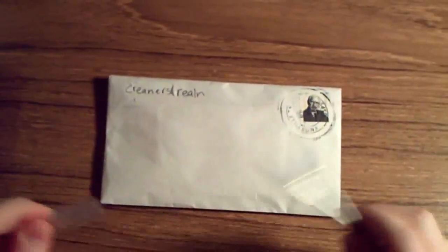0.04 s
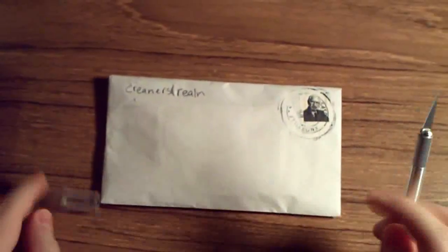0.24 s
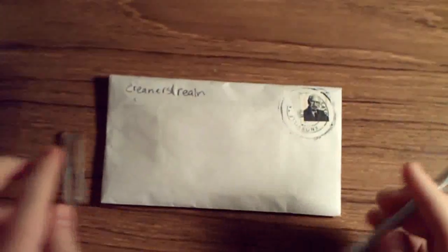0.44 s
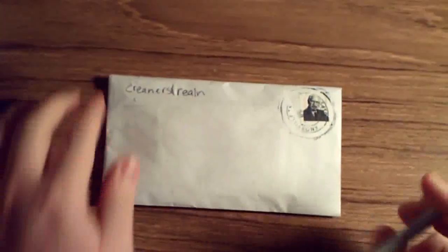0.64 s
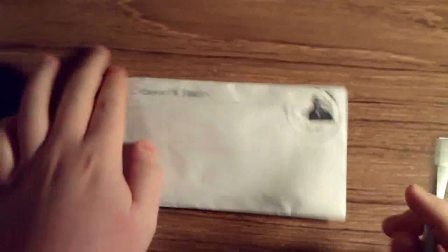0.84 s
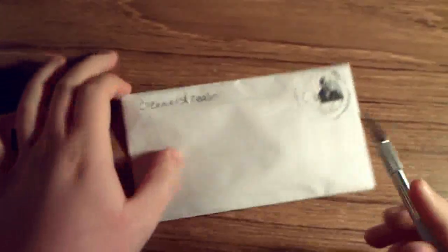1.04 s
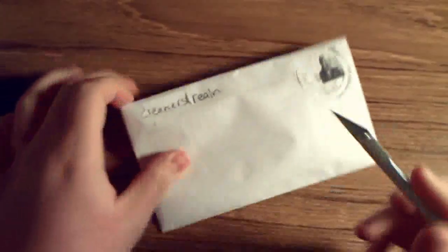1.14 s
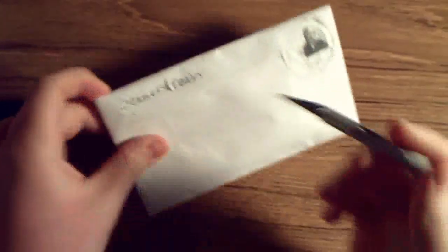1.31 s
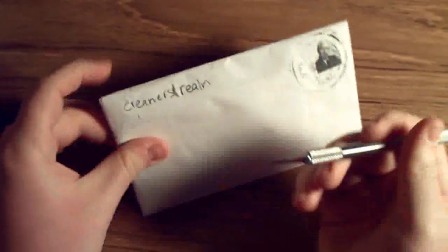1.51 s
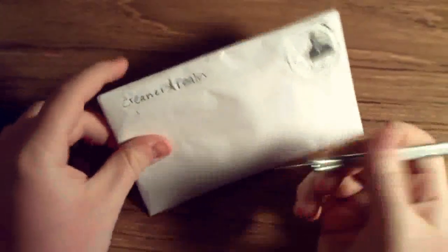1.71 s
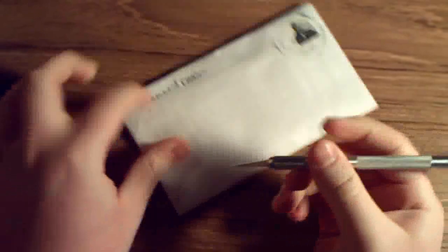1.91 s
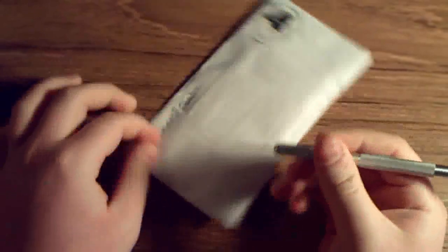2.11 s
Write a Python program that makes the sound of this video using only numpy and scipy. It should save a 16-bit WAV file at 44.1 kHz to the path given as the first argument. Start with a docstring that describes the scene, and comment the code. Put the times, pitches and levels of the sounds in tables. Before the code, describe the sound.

A small plastic cap rattles on a wooden table, then a paper envelope slides and crackles.

```python
"""A craft knife's small plastic cap clicks down on a wooden table, topples and rattles to rest.
Each hit knocks the wood and rings the cap's modes; later a hand knocks it again.
The hand slides a paper envelope over the wood and lifts it: fibres slip and hiss, creases buckle and snap.
Behind it all is a small quiet room with a low rumble and mains hum."""
import sys
import numpy as np
from scipy import signal
from scipy.fft import rfft, irfft
from scipy.io import wavfile

SR = 44100
rng = np.random.default_rng(int(sys.argv[2]) if len(sys.argv) > 2 else 0)


def to_wav(s):
    """Save 16-bit WAV."""
    ch = np.atleast_2d(s).T  # columns
    pcm = np.round(np.clip(ch, -1, 1) * 32767)  # PCM
    wavfile.write(sys.argv[1], SR, pcm.astype(np.int16))


N = 94815


def from_db(db):
    """Decibels to gain."""
    return 10 ** (np.asarray(db) / 20)


def unit(x):
    """Scale to energy 1."""
    return x / np.sqrt(np.sum(x ** 2) + 1e-20)


def at_level(x, db):
    """Scale to an rms level, steady or moving."""
    return unit(x) * np.sqrt(N) * from_db(db)


def curve(rows, column=1):
    """One table column, linearly interpolated in time."""
    rows = np.array(rows)
    return np.interp(np.arange(N) / SR, rows[:, 0], rows[:, column])


def through(x, response):
    """Convolve with an impulse response."""
    return signal.fftconvolve(x, response)[:N]


def colour(x, points, size=8192):
    """Minimum-phase filter with the given spectrum; keeps the energy of white input."""
    hz, db = np.transpose(points)
    bins_hz = np.arange(size // 2 + 1) * SR / size
    gain = from_db(np.interp(np.log(bins_hz + 1), np.log(hz), db))
    cepstrum = irfft(np.log(gain))
    cepstrum[1:size // 2] *= 2
    cepstrum[size // 2 + 1:] = 0
    response = irfft(np.exp(rfft(cepstrum)))
    return through(x, unit(response))


def resonate(x, hz, q):
    """A band-pass resonance, applied twice for steep skirts."""
    b, a = signal.iirpeak(hz, max(q, 1), fs=SR)
    return signal.lfilter(b, a, signal.lfilter(b, a, x))


def decay(t60_s):
    """Times and envelope of an exponential decay."""
    t = np.arange(SR // 2) / SR
    return t, np.exp(-np.log(1000) * t / t60_s)


def scatter(t60_s):
    """Decaying noise of energy 1."""
    t, envelope = decay(t60_s)
    return unit(envelope * rng.standard_normal(len(t)))


def flutter(t60_s):
    """Decaying micro-contacts of random sign."""
    t, envelope = decay(t60_s)
    return unit(envelope * rng.choice([-1, 1], len(t)))


def contact(t60_s, chatter):
    """A sharp click, then decaying micro-contacts."""
    burst = chatter * scatter(t60_s)
    burst[0] = 1
    return unit(burst)


def grains(per_s, spread_db=2.5):
    """Random tiny slips of uneven size."""
    sizes = from_db(spread_db * np.minimum(rng.exponential(1, N), 4))
    slips = rng.random(N) < per_s / SR
    return slips * sizes * rng.choice([-1, 1], N)


def add(out, start_s, db, sound):
    """Mix in an event; its level is that of its energy packed into 1 ms."""
    start = int(np.clip(start_s * SR, 0, N - 1))
    part = sound[:N - start]
    out[start:start + len(part)] += from_db(db) * np.sqrt(SR / 1000) * part


# Room noise spectrum. Each row: frequency in Hz, relative gain in dB.
RUMBLE_COLOUR = [(20, 1.5), (60, 2), (85, -8), (150, -8.5), (250, -12), (600, -17), (1400, -26),
                 (2000, -26.5), (4500, -43), (8000, -34), (10000, -39.5), (13000, -53), (15000, -57)]
# Mains hum. Each row: frequency in Hz, rms level in dB.
HUM_TONES = [(58, -73.5), (120, -67)]


def background():
    """Rumble, hiss and hum of the room."""
    t = np.arange(N) / SR
    hum = sum(np.sqrt(2) * from_db(db) * np.sin(2 * np.pi * (hz * t + rng.random()))
              for hz, db in HUM_TONES)
    rumble = colour(rng.standard_normal(N), RUMBLE_COLOUR)
    return hum + at_level(rumble, db=-57.5)


# Echo spectrum. Each row: frequency in Hz, relative gain in dB.
ECHO_COLOUR = [(60, -11), (300, 1), (1400, -4.5), (3000, -3.5), (8000, -1.5), (15000, -2.5)]


def room_echo(x, delay_s=0.003):
    """Near reflections and a short tail."""
    early = from_db(-12) * scatter(t60_s=0.046)
    late = from_db(-12.5) * scatter(t60_s=0.25)
    response = np.r_[np.zeros(int(delay_s * SR)), early + late]
    return colour(through(x, response), ECHO_COLOUR)


# Hand on the table. Each row: start in seconds, initial level in dB, frequency in Hz, T60 in seconds.
HAND_BUMPS = [(0.917, -40.5, 33, 0.11), (1.874, -45.5, 168, 0.15)]


def hand_bumps():
    """The hand bumps the table top: low, soft thuds."""
    out = 0
    for start_s, db, hz, t60_s in HAND_BUMPS:
        age_s = np.maximum(np.arange(N) / SR - start_s, 0)
        envelope = from_db(db) * np.exp(-np.log(1000) * age_s / t60_s)
        out = out + envelope * np.sin(2 * np.pi * hz * age_s)
    return out


# Paper on wood and skin. Each row: time in seconds, hiss level in dB, rub level in dB.
SLIDE_LEVELS = [(0, -65.5, -63.5), (0.07, -73, -82), (0.2, -73, -72), (0.75, -73, -71),
                (0.81, -73.5, -63.5), (0.87, -60.5, -53), (0.915, -60, -68), (0.98, -55.5, -58),
                (1.04, -59.5, -58.5), (1.10, -61, -63.5), (1.14, -55, -53), (1.18, -65.5, -64),
                (1.24, -51, -59), (1.30, -57.5, -57.5), (1.34, -69, -67), (1.40, -65.5, -66.5),
                (1.46, -63, -63), (1.53, -69, -59.5), (1.60, -67.5, -55), (1.66, -64, -57),
                (1.72, -52.5, -60), (1.785, -51.5, -51.5), (1.81, -50.5, -51), (1.88, -55.5, -49.5),
                (1.92, -63.5, -54.5), (1.97, -60.5, -60.5), (2.03, -70.5, -58.5), (2.09, -62.5, -63),
                (2.15, -52, -60.5)]
# Hiss and rub spectra. Each row: frequency in Hz, relative gain in dB.
FIBRE_HISS_COLOUR = [(500, -24), (1700, -4), (2200, 3.5), (3600, 2.5), (4400, 3), (5400, 0), (6100, 3.5),
                     (7000, 0), (8800, -2), (11000, -14.5), (13000, -20), (15000, -40)]
HOLLOW_RUB_COLOUR = [(60, -8), (170, -0.5), (270, -14.5), (430, 0), (560, -7.5), (800, -2), (1150, 1.5),
                     (1450, 4), (1850, -18), (2600, -9.5), (12000, -59)]


def paper_slide():
    """Fibres catch and slip: a bright hiss and the hollow rub of the envelope's body."""
    hiss = at_level(grains(per_s=5000), curve(SLIDE_LEVELS, column=1))
    rub = at_level(grains(per_s=5000), curve(SLIDE_LEVELS, column=2))
    return colour(hiss, FIBRE_HISS_COLOUR) + colour(rub, HOLLOW_RUB_COLOUR)


# The fastest slide. Each row: time in seconds, level in dB.
SWISH_LEVELS = [(1.66, -120), (1.70, -67), (1.73, -57), (1.772, -46.5), (1.795, -54), (1.87, -120)]
# Sheet resonances. Each row: frequency in Hz, Q, relative gain in dB.
SHEET_RESONANCES = [(4550, 12, 0), (4900, 14, -0.12), (6040, 6.8, -1.1)]


def paper_swish():
    """Quick slips of the edge drive the sheet's upper resonances."""
    slips = grains(per_s=1300)
    sheet = sum(from_db(db) * resonate(slips, hz, q) for hz, q, db in SHEET_RESONANCES)
    return at_level(sheet, curve(SWISH_LEVELS))


# Buckling creases. Each row: start in seconds, crack level in dB, panel resonance in Hz,
# crack T60 in seconds, thump level in dB.
CREASE_SNAPS = [(0.848, -47.5, 2570, 0.021, -53), (0.859, -48.5, 6000, 0.012, -62),
                (0.893, -39, 2170, 0.035, -39), (1.136, -44, 2530, 0.028, -60),
                (1.2105, -44, 2360, 0.015, -56), (1.2814, -28, 2980, 0.036, -35),
                (1.2865, -37, 2320, 0.031, -37.5), (1.365, -47.5, 6660, 0.0078, -52),
                (1.389, -45, 2400, 0.065, -45.5), (1.4006, -49.5, 3000, 0.026, -41),
                (1.488, -40, 2900, 0.013, -44.5), (1.5946, -46, 2030, .054, -47),
                (1.6976, -34, 2000, 0.019, -39.5), (1.771, -45, 5600, 0.013, -49),
                (1.788, -45, 2400, 0.013, -40), (1.828, -29.5, 2970, 0.033, -39),
                (1.8413, -36.5, 2360, 0.012, -47), (1.8548, -43, 2180, 0.013, -44),
                (1.8729, -42, 2300, 0.033, -34.5), (1.8859, -36, 2470, .018, -47),
                (1.9292, -45, 3800, 0.0043, -60), (1.9391, -34, 3200, 0.015, -32.5),
                (1.9432, -34.5, 2270, 0.016, -41)]
# Crack and thump spectra. Each row: frequency in Hz, relative gain in dB.
CRACK_COLOUR = [(200, -38), (900, -6.5), (1900, -2.5), (3100, 1), (4200, -4.5), (6500, -5), (9000, -11.5),
                (12000, -32), (15000, -46)]
THUMP_COLOUR = [(150, -22), (430, -17), (580, -13.5), (750, 3.5), (1250, -0.5), (1800, -12), (5000, -36)]


def paper_snaps():
    """Creases buckle: a dry crack with a broad panel resonance, and a thump of the envelope's body."""
    cracks, thumps = np.zeros((2, N))
    for start_s, crack_db, panel_hz, t60_s, thump_db in CREASE_SNAPS:
        crack = flutter(t60_s)
        panel = 1.02 * resonate(crack, panel_hz, q=1.8)
        add(cracks, start_s, crack_db, unit(colour(crack + panel, CRACK_COLOUR)))
        add(thumps, start_s, thump_db, contact(t60_s=0.023, chatter=1.96))
    return cracks + colour(thumps, THUMP_COLOUR)


# Modes of the cap. Each row: frequency in Hz, relative level in dB, T60 in seconds.
PLASTIC_MODES = [(1860, -15, 0.12), (2175, -13.5, 0.12), (2830, -6.5, 0.061), (3120, -17.5, 0.058),
                 (6486, -9.5, 0.076), (8126, -2.5, 0.021), (8175, -10, 0.081), (13900, -27, 0.02)]


def cap_ring(rim_db, rim_above_hz=7500, spread_db=1.6, detune=0.003):
    """The cap rings; the contact point sets the rim's share and shifts each mode a little."""
    out = 0
    for hz, db, t60_s in PLASTIC_MODES:
        t, envelope = decay(t60_s)
        mode_db = db + rim_db * (hz > rim_above_hz) + spread_db * rng.standard_normal()
        strength = from_db(mode_db) * rng.choice([-1, 1])
        mode_hz = hz * (1 + detune * rng.uniform(-1.1, 1))
        out = out + strength * unit(envelope * np.sin(2 * np.pi * mode_hz * t))
    return out


# The cap's edge meets the wood. Each row: start in seconds, level in dB.
HELD_TAPS = [(0.2196, -28.5), (0.2264, -29), (0.2336, -33.5)]
# Damped tap spectrum. Each row: frequency in Hz, relative gain in dB.
HELD_TAP_COLOUR = [(60, 5), (170, 1.5), (650, 7.5), (1050, 1), (1450, -14), (2400, -21), (3550, 8),
                   (4250, -3), (4900, -15), (6100, -28), (7250, -0.5), (7800, -22), (9500, -10.5),
                   (15000, -34)]


def cap_set_down(ring_gain_db=-13.5):
    """Three quick taps, damped by the fingers that still hold the cap."""
    taps, rings = np.zeros((2, N))
    for start_s, db in HELD_TAPS:
        add(taps, start_s, db, contact(t60_s=0.026, chatter=0.87))
        add(rings, start_s, db + ring_gain_db, cap_ring(rim_db=6))
    return colour(taps, HELD_TAP_COLOUR) + rings


# Loose cap on the table. Each row: start in seconds, wood knock in dB, plastic tick in dB, rim in dB.
RATTLE_HITS = [(0.2648, -24, -22, -34), (0.2681, -30, -20.5, -15.5), (0.2735, -26, -40, -41),
               (0.2788, -31.5, -21.5, -35), (0.2875, -32.5, -29.5, -37), (0.2988, -49, -35, -38),
               (0.3232, -34.5, -31.5, -48), (0.332, -38, -30, -39), (0.34, -36, -32.5, -35),
               (0.3540, -27, -46, -43), (0.367, -34, -33.5, -34), (0.3796, -30.5, -33.5, -34),
               (0.397, -39, -43, -53), (0.3996, -33, -41, -39.5), (0.4143, -39, -41.5, -48),
               (0.4234, -42.5, -43, -49), (0.4275, -29.5, -46, -50), (0.4366, -43, -45, -57),
               (0.4522, -42, -54, -55), (0.4790, -36, -43.5, -54), (0.4902, -39, -61, -66),
               (0.879, -34.5, -37.5, -52), (0.9259, -27.5, -30.5, -30.5), (0.9328, -32, -43, -44),
               (0.9417, -43, -40.5, -43), (0.9493, -40, -51, -46), (0.9536, -34, -44, -50),
               (0.9621, -33, -55, -58), (0.9730, -38, -36.5, -55), (0.9863, -42, -55, -60),
               (0.9980, -41, -65, -57)]
# Rim rolling on the grain. Each row: time in seconds, level in dB.
ROLL_LEVELS = [(0.26, -92), (0.28, -49), (0.33, -49.5), (0.40, -48), (0.46, -51.5), (0.51, -55.5),
               (0.61, -83), (0.91, -91), (0.935, -47.5), (0.99, -52.5), (1.03, -59.5), (1.08, -82)]
# Knock and tick spectra. Each row: frequency in Hz, relative gain in dB.
WOOD_COLOUR = [(60, -7), (250, -9), (450, -5.5), (650, 1.5), (1000, 3), (1420, 3.5), (1700, -5), (2700, -2),
               (4000, -11), (8000, -33), (15000, -71)]
PLASTIC_COLOUR = [(200, -23), (1000, -17.5), (2000, -1), (3000, 0.5), (4800, -2.5), (8000, -2),
                  (9000, -6.5), (11000, -12), (13000, -23), (15000, -28)]


def cap_rattle():
    """Each hit knocks the wood, ticks and rings the cap; the rim rolls in between."""
    knocks, ticks, rings = np.zeros((3, N))
    for start_s, knock_db, tick_db, rim_db in RATTLE_HITS:
        add(knocks, start_s, knock_db, contact(t60_s=0.0029, chatter=0.7))
        add(ticks, start_s, tick_db, contact(t60_s=0.011, chatter=3.8))
        add(rings, start_s, tick_db, cap_ring(rim_db - tick_db))
    roll = at_level(grains(per_s=1500, spread_db=3.5), curve(ROLL_LEVELS))
    roll_ring = from_db(-13.5) * through(roll, cap_ring(rim_db=-13))
    wood = colour(knocks + roll, WOOD_COLOUR)
    table_ring = from_db(-8) * resonate(wood, hz=1420, q=16)
    return wood + table_ring + colour(ticks, PLASTIC_COLOUR) + rings + roll_ring


def scene():
    """Cap and envelope on the table, in the room; mono."""
    direct = cap_set_down() + cap_rattle() + paper_snaps() + paper_slide() + paper_swish()
    return (direct + room_echo(direct) + hand_bumps() + background())[None]


def record(dry):
    """Steep elliptic low-pass."""
    cutoff_hz = 14750
    lowpass = signal.ellip(10, 0.2, 80, cutoff_hz, fs=SR, output="sos")
    return signal.sosfilt(lowpass, dry)


dry = scene()
out = record(dry)
to_wav(out)
```